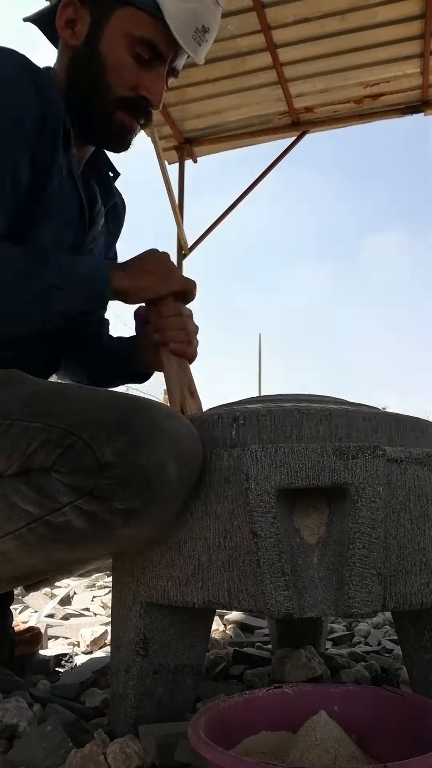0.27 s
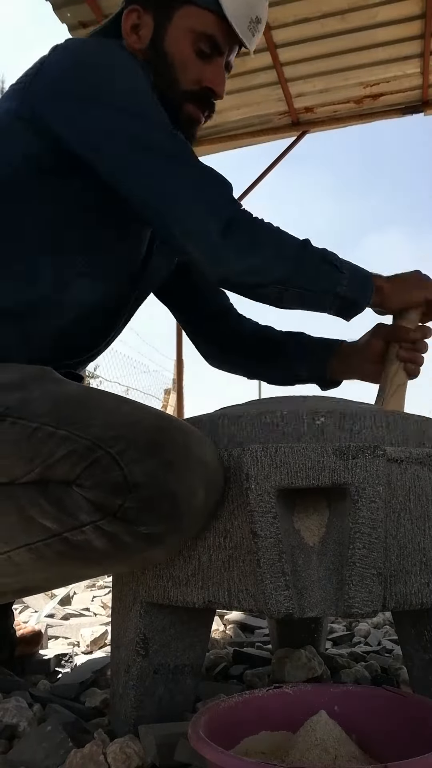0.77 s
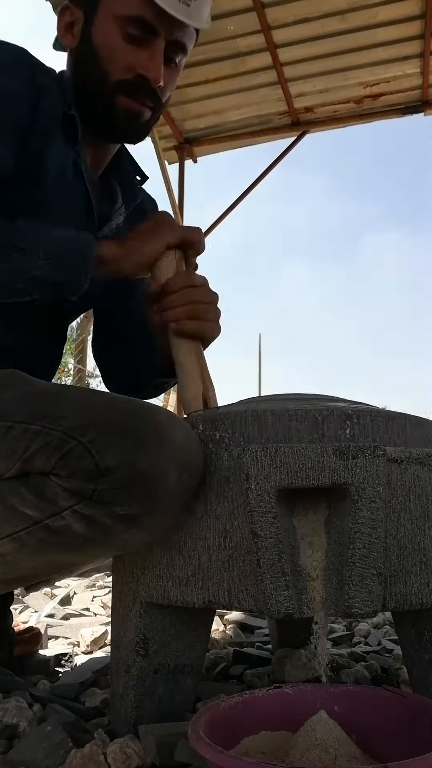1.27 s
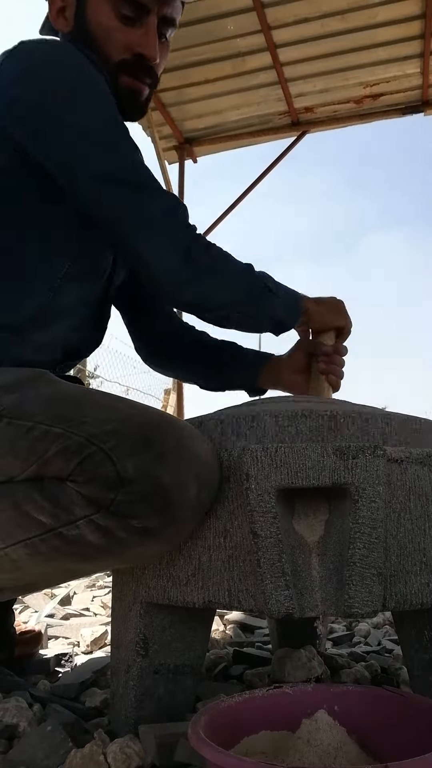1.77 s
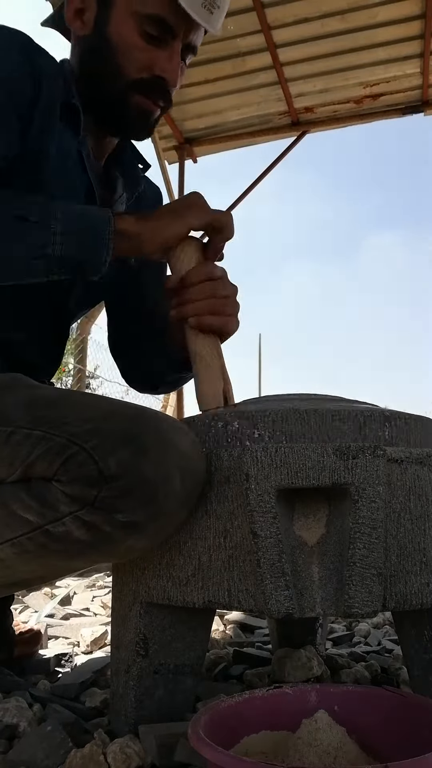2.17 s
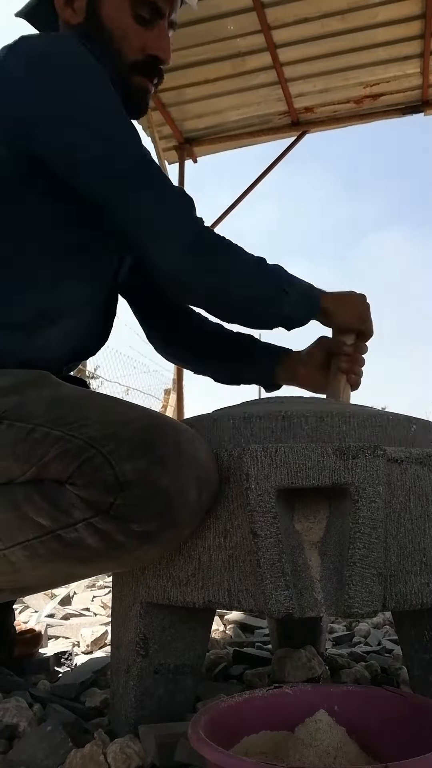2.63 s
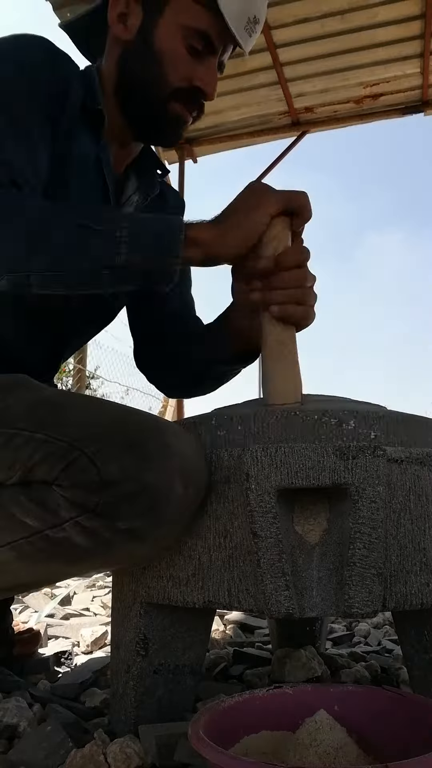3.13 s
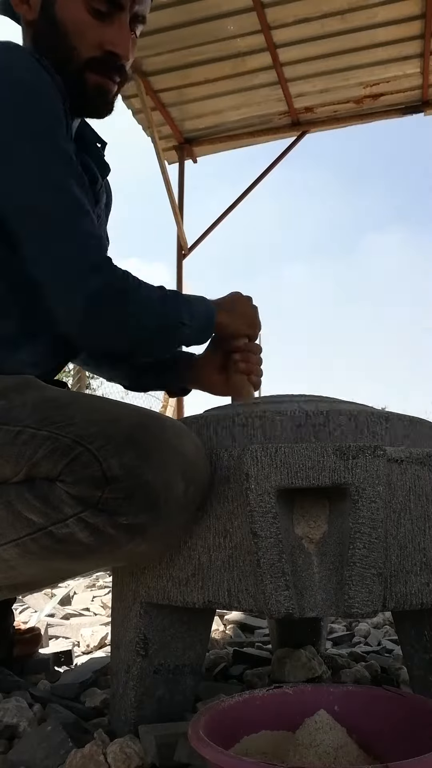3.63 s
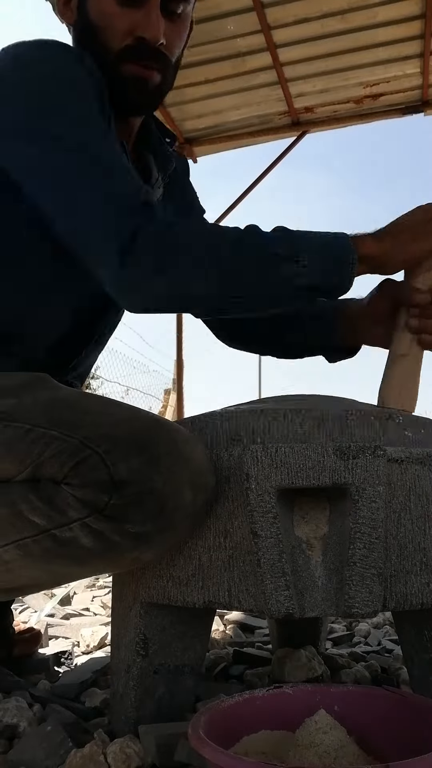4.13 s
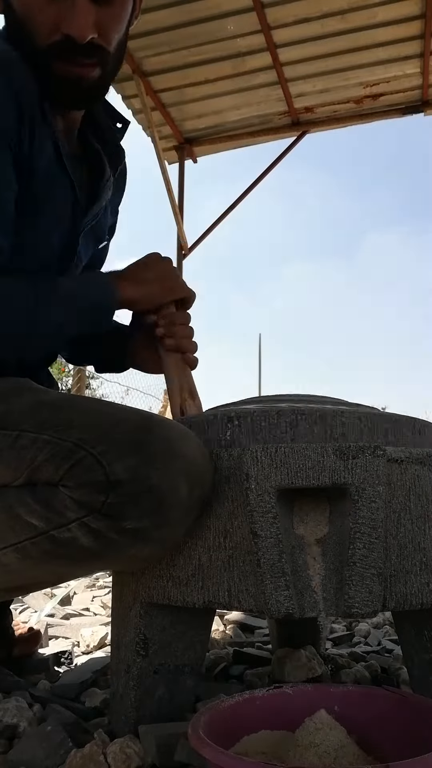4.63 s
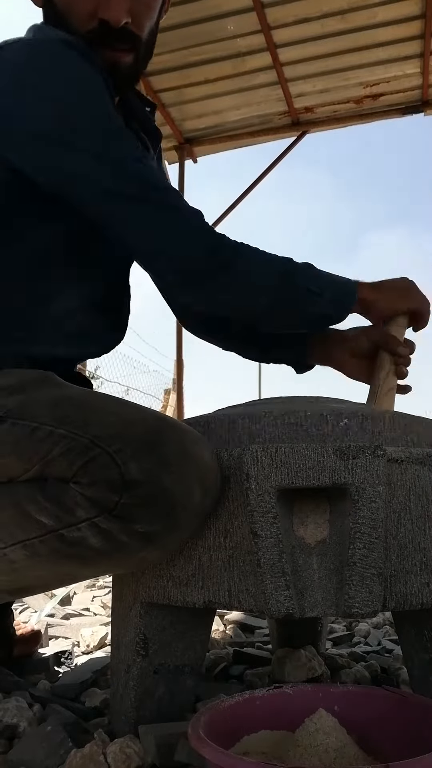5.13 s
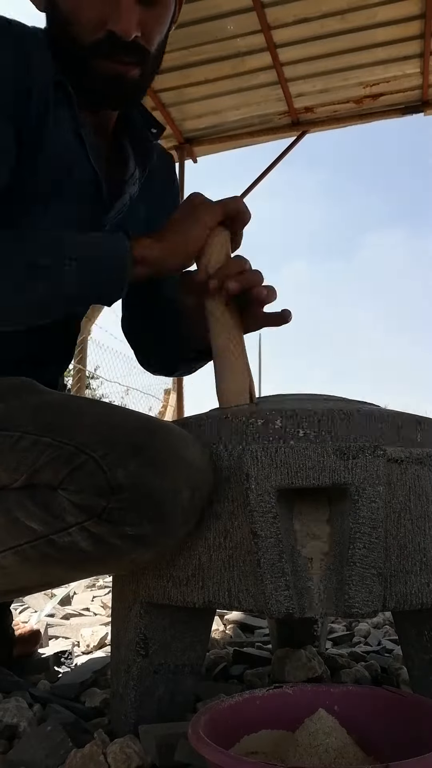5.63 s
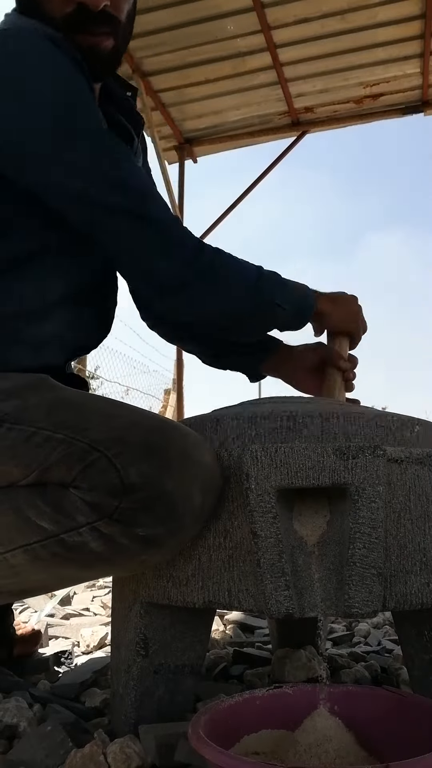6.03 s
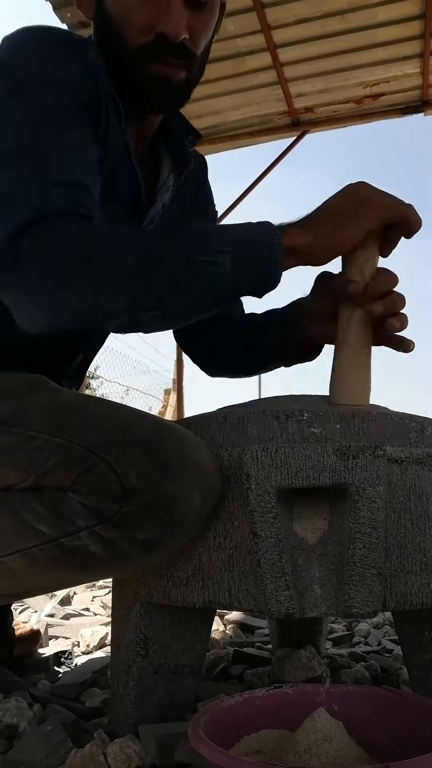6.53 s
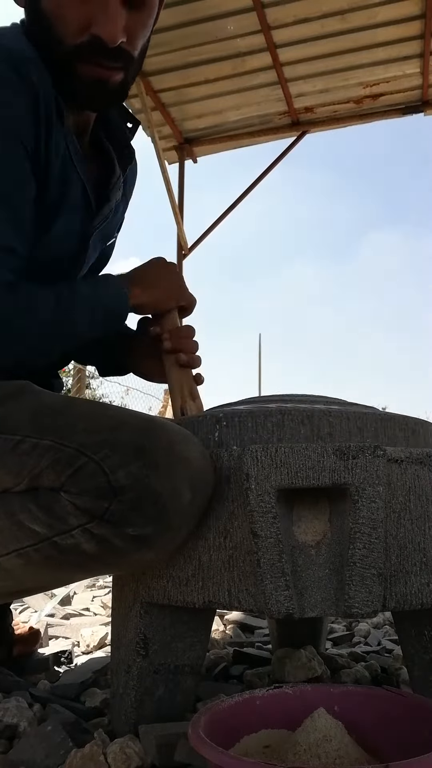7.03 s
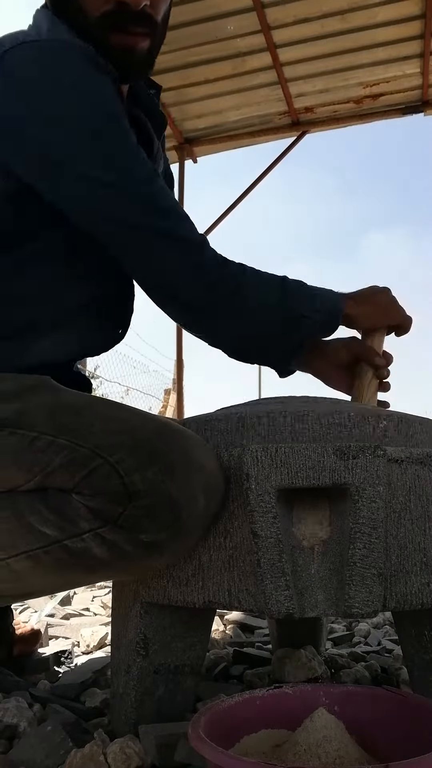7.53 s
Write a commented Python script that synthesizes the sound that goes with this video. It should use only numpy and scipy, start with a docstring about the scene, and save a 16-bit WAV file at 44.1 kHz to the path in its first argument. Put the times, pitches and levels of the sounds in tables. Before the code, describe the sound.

A stone hand mill is cranked steadily, a little under a second per turn. Grain crunches in low, hollow stone tones, strongest on each push, with dull thuds and knocking bumps. The iron pivot rings in short, wavering metallic tones and rattles about once a turn. Thin high squeaks slip through, and flour hisses softly throughout. Close stereo pickup under an open shelter, dry with only a few faint dull echoes.

```python
"""Heavy stones grind, thud and bump as a hand mill is turned under an open shelter, close to a pair of ports.
Crushed kernels and high spots set damped stone modes ringing; single kernels burst with a dull thud.
The iron pivot rings from dense slips, rattles most once a turn and is joined by thin gliding squeaks.
Flour hisses as flickering bands of noise, the stand thrums below, and a few dull echoes follow."""
import sys
import numpy as np
from scipy import signal
from scipy.io import wavfile
from scipy.ndimage import uniform_filter1d, map_coordinates

SR = 44100
rng = np.random.default_rng(int(sys.argv[2]) if len(sys.argv) > 2 else 0)


def ratio(d):
    """dB to gain"""
    e = np.asarray(d, float) / 20
    return 10 ** e


def waveform_to_disk(signal):
    """Save audio, clipped to [-1, 1], as 16-bit WAV at the path in sys.argv[1]."""
    frames = np.transpose(np.atleast_2d(signal))
    scaled = np.clip(frames, -1, 1) * 32767
    samples = np.round(scaled).astype(np.int16)
    wavfile.write(sys.argv[1], SR, samples)


N = 343980

# Levels in the tables are nominal: each layer adds its own trim.
# modes of the stones, deep, main and sharp: (f/Hz, width/Hz, level/dB)
STONE_LOW = [(131.6, 130, -39), (173.6, 37, -14), (226.2, 53, -10)]
STONE_MAIN = [(279.5, 26, -1.5), (327.3, 27.4, 6.5), (386, 47, 2.5), (490, 220, -7.5)]
STONE_HIGH = [(593, 160, 7), (668.5, 61, 2.5), (770, 85, 0), (953, 80, -12.5), (1072, 104, -12),
              (1320, 1700, -27.5)]
# deeper modes of the iron pivot: (f/Hz, width/Hz, level/dB, left over right/dB)
IRON_LOW = [(1593, 52, 0, 0)]
IRON_MIDDLE = [(2530, 17, 0, 0), (3672, 50, -20, -2)]
# how alike the two ports sound: (f/Hz, likeness 0-1)
PORT_LIKENESS = [(60, 1), (110, 1), (200, 0.93), (380, 0.94), (700, 0), (1290, 1), (2380, 0.05),
                 (4400, 0.51), (8120, 0), (15000, 0)]
# balance of the two ports: (f/Hz, left over right/dB)
PORT_LEAN = [(60, 0), (210, .5), (330, -1), (500, -6), (770, -6.5), (1170, 2), (2740, -1), (4190, -5.5),
             (6410, -5.5), (9810, -4.5), (15000, -11)]


def at_hz(points, hz):
    """A curve over frequency, read on a log-frequency axis."""
    return np.interp(np.log(hz), np.log(np.array(points)[:, 0]), np.array(points)[:, 1])


def rms_one(x):
    """Scaled to unit rms."""
    return x / np.sqrt(np.mean(x ** 2) + 1e-20)


def drift(rate):
    """Slow random wander of rms about 1: noise through two equal low-pass poles at rate Hz."""
    r = np.exp(-80 * np.pi * rate / SR)   # one slow step is 40 samples
    noise = rng.standard_normal(N // 40 + 2002)
    slow = signal.lfilter([1], [1, -2 * r, r * r], noise)[2000:]
    return np.interp(np.arange(N) / 40, np.arange(len(slow)), rms_one(slow))


def angle():
    """Handle angle in degrees, even speed within each turn."""
    # moments when the handle passes the light spot of its round: (t/s)
    turn_times = [-0.8, 0.02, 0.885, 1.78, 2.65, 3.52, 4.37, 5.28, 6.05, 6.83, 7.6, 8.38]
    return 360 * (np.interp(np.arange(N) / SR, turn_times, np.arange(len(turn_times))) % 1)


def round_turn(rows):
    """Columns of a table over one turn, repeated at every turn."""
    deg, *columns = np.transpose(rows)
    return [np.interp(angle(), deg, column, period=360) for column in columns]


def pressure_db():
    """Pressure on the grain round each turn, as a crushing level."""
    # a weak pull and a strong push: (angle/degrees, crushing level/dB)
    pull_and_push = [(0, -47.5), (30, -39.5), (60, -43.5), (90, -40.5), (120, -47), (150, -44.5),
                     (180, -43.5), (210, -40), (240, -34.5), (270, -30), (300, -32.5), (330, -37)]
    crush_db, = round_turn(pull_and_push)
    return crush_db


def swelling(steady_db, spells):
    """Gain of a steady level with spells on top that rise, hold and fall; powers add."""
    edge_s = 0.055   # longest rise or fall
    power, t = ratio(steady_db) ** 2 * np.ones(N), np.arange(N) / SR
    for middle_s, length_s, db in spells:
        half_s = length_s / 2
        a, b = np.searchsorted(t, [middle_s - half_s, middle_s + half_s])
        risen = np.clip((half_s - np.abs(t[a:b] - middle_s)) / min(edge_s, half_s), 0, 1)
        power[a:b] += (ratio(db) * np.sin(risen * np.pi / 2)) ** 2
    return np.sqrt(power)


def grains(per_s, spread_db, clump_db, clump_rate):
    """Signed sizes of random contacts that come in clumps; zero between them."""
    born = (rng.random(N) < per_s / SR) * rng.choice([-1, 1], N)
    return born * ratio(spread_db * np.minimum(rng.exponential(1, N), 5) + clump_db * drift(clump_rate))


def ring(force, hz, width_hz, lean_db):
    """One damped mode at two ports: force row 0 reaches both alike, row 1 in opposition."""
    # phase between the ports: (f/Hz, left leads/radians)
    port_lead = [(30, 0), (60, -.15), (150, -.4), (430, -1.1), (780, .8), (1290, -.7), (3600, -.3),
                 (5200, .2)]
    alike = np.clip(at_hz(PORT_LIKENESS, hz), 0, 1)
    ports = np.sqrt((1 + alike) / 2) * force[0] + np.sqrt((1 - alike) / 2) * force[1] * [[1], [-1]]
    pole = np.exp((2j * hz - width_hz) * np.pi / SR)
    swing = signal.lfilter([1], [1, -pole], ports + 1e-18)
    turn = np.exp(.5j * at_hz(port_lead, hz) * np.array([[1], [-1]]))
    return (swing * turn).imag * ratio(lean_db * np.array([[.5], [-.5]]))


def soft(x, modes):
    """Contacts last a moment and push both ways, so little sounds far outside the modes."""
    low_hz, high_hz = 0.83 * modes[0][0], min(1.11 * modes[-1][0], .45 * SR)
    return signal.sosfilt(signal.butter(3, [low_hz, high_hz], "band", fs=SR, output="sos"), x)


def rubbed(modes, sizes, scatter=0.63):
    """Every contact is a click that starts all modes at once, each with some strength of its own; rms 1."""
    at, out = np.flatnonzero(sizes), 0
    for hz, width_hz, db, *lean in modes:
        force = np.zeros((2, N))
        luck = rng.standard_normal((2, len(at)))
        force[:, at] = sizes[at] * ([[1], [0]] + [[scatter], [1]] * luck)
        lean_db = lean[0] if lean else at_hz(PORT_LEAN, hz)
        out = out + ratio(db) * np.sqrt(width_hz) * ring(force, hz, width_hz, lean_db)
    return rms_one(soft(out, modes))


def struck(events, modes, extra_db, pan_db, tilt_db=0):
    """Single blows start all modes at once, with new strengths each; tilt is dB per octave about 600 Hz."""
    at, out = np.round(events[:, 0] * SR).astype(int), 0
    luck = rng.standard_normal((len(at), 2 * len(modes)))
    for k, (hz, width_hz, db, *lean) in enumerate(modes):
        tilted_db = db + tilt_db * np.log2(hz / 600)
        size = ratio(events[:, 1] + extra_db + tilted_db + 2.5 * luck[:, 2 * k])
        force = np.zeros((2, N))
        force[0, at] = size
        force[1, at] = size * (0.84 * luck[:, 2 * k + 1] + np.tanh(pan_db / 17))
        out = out + ring(force, hz, width_hz, lean[0] if lean else at_hz(PORT_LEAN, hz))
    return soft(out, modes)


def steadied(x, share, over_s):
    """Friction feeds a ring less when it is already strong, which evens out its slow swings; rms 1."""
    power = uniform_filter1d(np.mean(x ** 2, axis=0), int(over_s * SR))
    return rms_one(x / (np.maximum(power, 0) + 1e-3) ** (share / 2))


def wavering(x, share):
    """Read a little faster and slower by turns, so the pitch wanders by this rms share."""
    at = np.arange(N) + np.cumsum(share * drift(8.9))
    return np.array([map_coordinates(port, [at], order=3, mode="mirror") for port in x])


def shelter(x):
    """Dull echoes from roof and ground: the right port's sound returns in the left, four times delayed."""
    dull = signal.sosfilt(signal.butter(1, [450., 3500.], "band", fs=SR, output="sos"), x)
    out = np.zeros_like(x)
    for lag_s, db in [(.006, -29), (.0085, -16), (.014, -14.5), (.019, -11)]:
        lag = int(lag_s * SR)
        out[0, lag:] += ratio(db) * dull[1, :-lag]
    return out


def flour():
    """Flour and dust hiss in the gap: uneven noise in narrow bands, each flickering a little on its own."""
    # colour of the hiss: (f/Hz, relative level per Hz/dB)
    hiss_colour = [(1000, -6.5), (1400, -3), (2150, -0.5), (3000, 0.4), (4400, -5), (5800, -7.5),
                   (7300, -5), (8000, -2.5), (9200, -2), (10400, -8.5), (10900, -14), (12000, -16),
                   (14000, -18), (15700, -31)]
    # flour spills out faster: (middle t/s, length/s, level/dB)
    spill_spells = [(1.2, 0.2, -59), (2.985, 0.35, -58), (3.798, 0.3, -60), (4.626, 0.18, -53),
                    (5.6, 0.33, -60), (6.333, 0.26, -51.5), (7.038, 0.16, -56)]
    out, together = 0, drift(9.)
    edges = 950 * 2 ** np.arange(0, 4.3, 1 / 6)   # sixth-octave bands
    white = rng.standard_normal((2, 2, N)) * ratio(0.8 * rng.exponential(1, N))
    crush_db = pressure_db()
    # the hiss is pinched off a little under pressure
    hiss = swelling(-52.5 - 0.065 * (crush_db - crush_db.mean()), spill_spells)
    for k, (low, high) in enumerate(zip(edges, edges[1:])):
        band = signal.butter(2, [low, high], "band", fs=SR, output="sos")
        mid, side = signal.sosfilt(band, white[k % 2])
        hz = np.sqrt(low * high)
        alike = np.clip(at_hz(PORT_LIKENESS, hz) - .05, 0, 1)
        flicker_db = 1.37 * together + 2.14 * drift(32.0)
        lean_db = at_hz(PORT_LEAN, hz) * np.array([[.5], [-.5]])
        gain = ratio(at_hz(hiss_colour, hz) + flicker_db + lean_db)
        out = out + gain * (np.sqrt(1 + alike) * mid + np.sqrt(1 - alike) * side * [[1], [-1]])
    return ratio(5.5) * hiss * rms_one(out)


def squeaks():
    """Short near-sines that glide, flutter and fade at both ends, louder at the right port."""
    # thin gliding squeaks: (start t/s, end t/s, first f/Hz, last f/Hz, level/dB)
    glides = [(.54, .6, 14400, 13900, -70), (1.7, 1.745, 11200, 12300, -64),
              (1.785, 1.93, 12000, 8300, -62), (2.18, 2.255, 9900, 10600, -59),
              (3.85, 3.92, 8300, 8700, -63), (3.97, 4.03, 9300, 8400, -63), (3.57, 3.62, 10600, 9700, -60),
              (5.35, 5.42, 9800, 8900, -61), (5.64, 5.68, 9500, 10100, -59),
              (6.845, 6.875, 8600, 8100, -62), (6.93, 7.005, 10300, 8600, -60),
              (7.11, 7.15, 8250, 9150, -60), (7.145, 7.18, 9050, 9550, -60),
              (7.175, 7.205, 9520, 9680, -61), (7.21, 7.29, 9500, 8600, -64)]
    out, flutter = np.zeros(N), ratio(1.5 * drift(40.))
    for start_s, end_s, first_hz, last_hz, db in glides:
        a, b = int(start_s * SR), int(end_s * SR)
        phase = 2 * np.pi * np.cumsum(np.linspace(first_hz, last_hz, b - a)) / SR
        out[a:b] += ratio(db) * np.hanning(b - a) ** .3 * np.sin(phase)
    return out * flutter * ratio([[3.5], [8.5]])   # left, right


def rattle():
    """The loose iron chatters in uneven ticks, freed once a turn, and jolts in single blows."""
    # modes of the loose iron: (f/Hz, width/Hz, level/dB, left over right/dB)
    loose_modes = [(3400, 900, -8, -2), (4900, 600, -3, -4), (5195, 60, -6, -5), (5700, 55, -1, -5),
                   (7000, 900, -3, -4), (8460, 90, -7, -4), (9150, 700, -3, -4), (10330, 90, -10, -5),
                   (11280, 70, -12, -6), (12500, 900, -21, -7)]
    # fits of rattling: (middle t/s, length/s, level/dB)
    rattle_fits = [(0.006, 0.1, -54.5), (0.818, 0.36, -59.5), (1.752, 0.23, -52.5), (2.688, 0.062, -53.5),
                   (2.96, 0.22, -71.0), (3.3, 0.22, -69), (3.526, 0.22, -58.5), (3.75, 0.43, -77),
                   (4.09, 0.1, -73), (4.32, 0.22, -58.5), (5.15, 0.4, -66), (5.2, 0.14, -60),
                   (5.983, 0.041, -52.5), (6.41, 0.52, -64), (6.748, 0.086, -51.5), (7.27, 0.39, -66),
                   (7.525, 0.036, -47)]
    # single jolts: (t/s, level/dB)
    jolt_blows = [(0.0523, -29), (0.7008, -33), (0.7243, -22), (0.7801, -23), (0.791, -26), (0.8503, -32),
                  (0.877, -29), (0.908, -32), (0.9527, -31), (1.3498, -34.5), (1.657, -28), (1.667, -28),
                  (1.718, -34), (1.738, -18), (1.7674, -27), (1.783, -29), (1.793, -21), (1.807, -30),
                  (2.57, -22), (2.66, -39), (2.6883, -29), (3.1862, -26), (3.4404, -19), (3.4965, -36),
                  (3.532, -19), (4.068, -21), (4.277, -14), (4.3096, -19), (4.375, -23.5), (4.3999, -21.5),
                  (4.917, -27), (5.153, -21), (5.246, -24), (5.5682, -46), (5.7144, -41), (5.7468, -33),
                  (5.829, -23), (5.9674, -17), (6.0382, -24), (6.733, -24), (6.8746, -28), (7.3677, -25),
                  (7.5133, -24), (7.583, -27), (7.641, -22)]
    from_slack = (angle() - 479 + 180) % 360 - 180   # degrees from the slack spot
    slack_db = 8 * np.exp(-(from_slack / 21) ** 2)
    loose = swelling(-77 + slack_db, rattle_fits)
    ticks = grains(1300., spread_db=2.7, clump_db=5.5, clump_rate=53.0)
    chatter = ratio(8.0) * loose * steadied(rubbed(loose_modes, ticks), 0.27, .02)
    return chatter + struck(np.array(jolt_blows), loose_modes, -16.5, 0)


def pivot():
    """Dense slips keep the iron ringing; pitch and strength wander as the grip on it changes."""
    # higher modes of the pivot: (f/Hz, width/Hz, level/dB, left over right/dB)
    iron_high = [(4094, 24, 0, -6), (4640, 24, -11, -4), (7780, 50, -15, -4)]
    iron_top = [(5195, 18, 0, -5), (6588, 24, -3, -5)]
    # modes take turns as the contact travels round: (angle/degrees, low, middle, high level/dB)
    contact_round = [(0.0, -52, -57.5, -67), (30.0, -60, -55, -62), (60.0, -64, -59.5, -59),
                     (96, -58, -53.5, -61), (122, -61, -62.5, -69), (152, -65, -56, -72),
                     (181, -72, -63.5, -83), (208, -66, -64, -65.5), (227, -53.5, -52, -61.5),
                     (262, -57, -58.5, -61.5), (308, -51, -54, -64), (346, -56.5, -50, -66)]
    # spells when one mode sings out: (middle t/s, length/s, level/dB, mode f/Hz)
    singing_spells = [(0.01, 0.12, -55, 5197.0), (0.015, 0.11, -45, 2522.0), (0.075, 0.22, -56, 4095.0),
                      (0.117, 0.36, -60, 1592.0), (0.18, 0.05, -49, 2522.0), (0.38, 0.06, -61, 4095.0),
                      (0.64, 0.07, -44.5, 2522.0), (0.797, 0.09, -42, 2522.0), (0.74, 0.14, -44.5, 1592.0),
                      (0.8, 0.32, -67, 5197.0), (0.82, 0.05, -56, 5197.0), (1.68, 0.055, -64, 5197.0),
                      (0.912, 0.031, -46, 1592.0), (0.96, 0.07, -44, 1592.0), (0.96, 0.054, -50, 2522.0),
                      (1.13, 0.37, -68, 5197.0), (1.158, 0.068, -51, 2522.0), (1.523, 0.04, -40, 1592.0),
                      (1.513, 0.15, -50.5, 2522.0), (1.613, 0.059, -48, 2522.0), (1.7, 0.13, -44.5, 2522.0),
                      (1.62, 0.2, -66, 4095.0), (1.573, 0.03, -48, 1592.0), (1.606, 0.071, -44, 1592.0),
                      (1.665, 0.053, -48, 1592.0), (1.755, 0.1, -44.5, 1592.0),
                      (1.843, 0.14, -44.5, 1592.0), (2.24, 0.053, -59, 1592.0), (4.286, 0.12, -47, 1592.0),
                      (4.402, 0.08, -49, 1592.0), (5.11, 0.05, -49, 1592.0), (5.347, 0.041, -55, 1592.0),
                      (5.726, 0.066, -53, 1592.0), (6.29, 0.035, -47, 1592.0), (6.749, 0.18, -56, 1592.0),
                      (7.49, 0.07, -53, 1592.0), (7.653, 0.06, -53, 1592.0), (1.82, 0.33, -72, 5197.0),
                      (1.87, 0.22, -58, 4095.0), (1.96, 0.17, -58, 2522.0), (2.11, 0.087, -50.5, 2522.0),
                      (2.287, 0.2, -59, 2522.0), (2.283, 0.056, -57, 4095.0), (2.47, 0.3, -61, 1592.0),
                      (2.594, 0.21, -49.5, 2522.0), (2.67, 0.36, -67, 4095.0), (2.69, 0.052, -47, 1592.0),
                      (2.917, 0.12, -56.5, 4095.0), (2.926, 0.09, -52, 2522.0), (2.96, 0.42, -69, 5197.0),
                      (2.964, 0.24, -53.5, 1592.0), (3.058, 0.096, -46.5, 2522.0),
                      (3.08, 0.08, -61, 4095.0), (3.163, 0.13, -63, 1592.0), (3.283, 0.038, -45, 1592.0),
                      (3.326, 0.046, -43, 1592.0), (3.365, 0.028, -54, 1592.0), (3.405, 0.028, -41, 1592.0),
                      (3.445, 0.029, -43, 1592.0), (3.455, 0.047, -39.5, 2522.0),
                      (3.578, 0.17, -61, 4095.0), (3.624, 0.033, -39.5, 2522.0), (3.61, 0.13, -45, 1592.0),
                      (3.782, 0.12, -52, 1592.0), (3.87, 0.2, -72, 4095.0), (4.083, 0.08, -51.5, 4095.0),
                      (4.117, 0.22, -54, 2522.0), (4.033, 0.061, -58, 1592.0), (4.172, 0.23, -56, 1592.0),
                      (4.337, 0.13, -47, 2522.0), (4.463, 0.1, -50.5, 2522.0), (4.573, 0.12, -49, 2522.0),
                      (4.53, 0.29, -57, 4095.0), (4.53, 0.36, -80, 5197.0), (4.53, 0.27, -67, 1592.0),
                      (4.667, 0.08, -54, 2522.0), (4.884, 0.056, -51.5, 2522.0), (4.912, 0.06, -50, 1592.0),
                      (4.965, 0.06, -48, 1592.0), (5.019, 0.044, -38, 1592.0),
                      (4.999, 0.051, -45.5, 4095.0), (5.045, 0.05, -48.5, 4095.0),
                      (5.058, 0.47, -60.5, 4095.0), (5.028, 0.053, -42, 2522.0),
                      (5.078, 0.11, -42.5, 2522.0), (5.17, 0.09, -43.5, 2522.0),
                      (5.222, 0.052, -46, 2522.0), (5.31, 0.4, -66, 5197.0), (5.404, 0.26, -53.5, 4095.0),
                      (5.493, 0.047, -47, 1592.0), (5.6, 0.35, -60, 2522.0), (5.609, 0.11, -44, 2522.0),
                      (5.663, 0.42, -65, 1592.0), (5.768, 0.26, -54, 4095.0), (5.877, 0.15, -49, 2522.0),
                      (5.878, 0.21, -54, 4095.0), (6.066, 0.058, -44.5, 2522.0), (6.084, 0.23, -63, 1592.0),
                      (6.227, 0.2, -64, 2522.0), (6.274, 0.57, -66, 5197.0), (6.272, 0.38, -59.5, 4095.0),
                      (6.477, 0.42, -52.5, 2522.0), (6.504, 0.046, -46.5, 1592.0),
                      (6.6, 0.2, -51.5, 4095.0), (6.757, 0.18, -46.5, 2522.0), (6.942, 0.17, -51, 1592.0),
                      (6.96, 0.32, -73, 5197.0), (7.004, 0.1, -51.5, 2522.0), (7.01, 0.38, -60.5, 4095.0),
                      (7.155, 0.13, -56, 2522.0), (7.298, 0.11, -49, 1592.0), (7.357, 0.32, -49.5, 2522.0),
                      (7.403, 0.19, -52, 4095.0), (7.5, 0.32, -67, 5197.0), (7.62, 0.15, -56.5, 4095.0),
                      (7.66, 0.24, -59, 2522.0), (7.668, 0.031, -40.5, 2522.0)]
    low_db, middle_db, high_db = round_turn(contact_round)
    # modes, steady level/dB, trim/dB, pitch wander as a share of 0.00792
    groups = [(IRON_LOW, low_db, .5, 0.294), (IRON_MIDDLE, middle_db, 4.2, 0.609),
              (iron_high, high_db, 6., 0.502), (iron_top, -71.5, 7.5, .25)]
    out = 0
    for modes, steady_db, trim_db, waver in groups:
        spells = [row[:3] for row in singing_spells if abs(np.log(row[3] / modes[0][0])) < .1]
        slips = grains(1300., spread_db=1.5, clump_db=1.2, clump_rate=25.)
        flutter = ratio(trim_db + 2.5 * drift(36))
        tone = steadied(wavering(rubbed(modes, slips), 0.00792 * waver), .7, .03)
        out = out + flutter * swelling(steady_db, spells) * tone
    return out


def thuds():
    """A bursting kernel pushes the stone for a cycle or two, damped by the meal around it."""
    # single bursts: (t/s, level/dB)
    bursts = [(0.031, -25), (0.062, -26), (0.132, -30), (0.263, -30), (0.375, -25), (0.408, -28),
              (0.437, -24), (0.478, -17), (0.526, -23), (0.56, -16), (0.572, -15), (0.586, -18),
              (0.608, -19), (0.649, -20), (0.662, -15), (0.69, -18), (0.766, -18), (0.934, -31),
              (0.953, -19), (1.016, -30), (1.056, -25), (1.282, -22), (1.327, -24), (1.35, -19),
              (1.364, -18.5), (1.388, -20), (1.411, -26), (1.425, -21), (1.442, -24), (1.48, -20),
              (1.508, -16), (1.529, -17), (1.553, -18), (1.601, -15), (1.612, -20), (1.629, -27),
              (1.648, -18), (1.661, -16), (1.735, -25), (1.818, -31), (1.853, -16), (1.91, -24),
              (2.159, -23), (2.225, -20), (2.271, -21.5), (2.353, -36), (2.394, -18), (2.435, -14),
              (2.501, -13), (2.527, -14.5), (2.609, -21.5), (2.69, -23), (2.798, -28), (2.867, -21),
              (2.914, -19), (2.979, -25), (3.157, -23), (3.22, -20), (3.258, -21), (3.29, -17),
              (3.368, -25), (3.4, -19), (3.431, -19), (3.602, -21), (3.663, -21), (3.714, -24),
              (3.769, -18.5), (3.803, -29), (3.851, -21), (3.98, -28), (4.011, -17), (4.05, -13),
              (4.164, -22), (4.404, -25), (4.434, -26), (4.495, -22), (4.542, -22.5), (4.565, -28),
              (4.606, -23), (4.67, -23), (4.779, -28), (4.858, -18), (4.899, -12), (4.963, -11.5),
              (5.006, -10), (5.111, -36), (5.164, -18), (5.244, -31), (5.349, -28), (5.371, -34),
              (5.4, -29), (5.482, -15.5), (5.555, -27), (5.634, -24), (5.658, -26), (5.699, -16),
              (5.709, -13), (5.75, -19), (5.783, -19), (5.827, -16.5), (5.87, -14), (5.943, -28),
              (5.965, -20), (5.982, -25), (6.064, -29), (6.131, -32), (6.187, -17), (6.205, -17),
              (6.231, -20), (6.28, -22.5), (6.334, -21), (6.443, -22), (6.455, -20), (6.495, -12),
              (6.539, -24), (6.579, -29), (6.652, -24), (6.71, -26), (6.872, -25), (6.917, -19),
              (6.953, -14), (7.035, -31), (7.099, -19), (7.178, -28), (7.266, -14), (7.305, -15.5),
              (7.337, -21), (7.373, -14), (7.418, -21), (7.427, -15.5), (7.482, -16), (7.658, -22),
              (7.708, -25), (7.739, -20)]
    # a thud rings 1.6 times shorter than the crush
    damped = [(hz, 1.6 * width_hz, db) for hz, width_hz, db in STONE_LOW[-1:] + STONE_MAIN]
    return struck(np.array(bursts), damped, -12.5, 0)


def bumps():
    """A bump snaps in the upper modes and the pivot, then bounces; a heavy one also shakes the whole stone."""
    # stone on stone: (t/s, snap level/dB, heft above the snap/dB, lean to the left/dB)
    stone_hits = [(0.032, -24, 3.5, 19), (0.563, -26, 11, -1), (0.61, -30, 5, -6), (0.664, -35, 16, -2),
                  (0.693, -22, 3.5, -9), (0.769, -26.5, -4, -8), (0.936, -23.5, 0, 22),
                  (1.351, -42, -4.5, -9), (1.439, -33, 0, -1), (1.482, -32.5, 12.5, -2),
                  (1.5133, -18, -14, -4), (1.532, -24, 3, -10), (1.6, -28.5, 13.5, -4),
                  (1.66, -24.5, 5, -7), (1.838, -21, -8, 20), (1.857, -23, -10, -10), (2.224, -37, -5, -4),
                  (2.353, -30, 3, 0), (2.438, -24.5, -1, 3), (2.488, -24, 8.5, -1), (3.16, -30.5, 2, -13),
                  (3.256, -30, 1, -9.0), (3.298, -23.5, 4, -9), (3.368, -23.5, 4, -9), (3.434, -22, -5, 1),
                  (3.606, -20.5, -5, 25), (4.011, -26, -9, -5), (4.049, -23.5, 12, 0),
                  (4.165, -22.5, -19, -1), (4.407, -32.5, -8, 10), (4.499, -30.5, 2, 3),
                  (4.846, -34, -1, -7), (4.901, -23, 11.5, 5), (4.916, -21.5, 5, 4), (4.964, -28, 6, -7),
                  (5.0139, -17, -3, 18), (5.029, -28, 9.5, 0), (5.112, -22.5, 3, -3), (5.166, -28.5, 6, 3),
                  (5.245, -24.5, -1.5, 25), (5.368, -34, -3, -1), (5.394, -44, 5, -1), (5.485, -23, 1, -4),
                  (5.637, -22, -2, 7), (5.687, -44, 4, -6.5), (5.712, -22.5, -16, 6), (5.879, -28.5, 5, -1),
                  (5.947, -27.5, 9, 6), (6.066, -29, 1.5, 7), (6.131, -29.5, 4, 0), (6.175, -34, -6, -2),
                  (6.191, -21.5, -10, 6), (6.281, -26.5, -8, -10), (6.496, -25.5, 7.5, -2),
                  (6.502, -20, -3, 11), (6.873, -26, -11, 19), (6.953, -20.5, -3, 15), (7.663, -22, -25, 9),
                  (7.718, -28, 2, 1)]
    # the first touch, dead within a cycle: (f/Hz, width/Hz, level/dB)
    crack_modes = [(895, 510, -20), (1290, 600, -21.5), (2180, 2700, -44.5)]
    rows = np.array(stone_hits)
    snap_db, heft_db, pan_db = rows[:, 1], rows[:, 2], rows[:, 3]
    body = struck(rows, STONE_MAIN, heft_db - 11.0, pan_db)
    # a hard blow is shorter than a crush, so it favours the upper modes
    bright = [(hz, 1.74 * width_hz, db) for hz, width_hz, db in STONE_HIGH]
    tilt_db = 19.0 + 1.5 * (snap_db + 24)   # a harder bump is brighter
    edge = struck(rows, bright, -9.0, pan_db, tilt_db)
    edge += struck(rows, crack_modes, 0, pan_db, tilt_db)
    # it lands twice more, unevenly, weaker and duller
    later_s = np.cumsum(0.0076 * rng.uniform(0.364, 1.6, (len(rows), 2)), axis=1)
    for k in range(2):
        landing = rows + np.outer(later_s[:, k], [1, 0, 0, 0])
        edge += struck(landing, bright, -7.5 - 7.5 * (k + 1), pan_db, tilt_db - 12.0)
    iron = struck(rows, IRON_LOW, -12.5, pan_db) + struck(rows, IRON_MIDDLE, -25.0, pan_db)
    return body + edge + iron


def stones_and_stand():
    """Crushing kernels drive the main and sharp stone modes; rolling weight drives the deep ones and the stand."""
    # modes of the stand: (f/Hz, width/Hz, level/dB)
    stand_modes = [(39.8, 38, -4), (61.9, 5.2, 2), (94, 15, -1.5)]
    # heaps of kernels giving way: (middle t/s, length/s, crush level/dB, grit against it/dB)
    crunch_spells = [(0.046, 0.2, -40, 2), (0.435, 0.13, -36.5, -25), (0.629, 0.4, -33.5, -0.5),
                     (0.67, 0.061, -29, -5), (0.799, 0.085, -35.5, 4.5), (1.026, 0.25, -35, -11.5),
                     (1.38, 0.18, -29.5, -19), (1.516, 0.32, -34, -1), (1.641, 0.17, -32, -1),
                     (1.91, 0.15, -33.5, -10.5), (2.14, 0.19, -45, -14), (2.239, 0.11, -27.5, -12),
                     (2.507, 0.28, -34.5, -1.5), (2.83, 0.29, -37, -9), (3.027, 0.06, -40, -10),
                     (3.443, 0.099, -32, 2.5), (3.634, 0.1, -37.5, 1.5), (3.756, 0.33, -41, -2),
                     (4.056, 0.14, -26, -6.5), (4.177, 0.045, -26, -10), (4.268, 0.12, -38, -1.5),
                     (4.4, 0.14, -46, -15), (4.616, 0.3, -35, -11), (4.965, 0.31, -36.5, -4),
                     (5.234, 0.08, -51, -11), (5.407, 0.094, -26, -9), (5.458, 0.23, -31.5, -10),
                     (5.584, 0.088, -40, -1), (5.641, 0.084, -34.5, 0), (5.72, 0.082, -30, 1.5),
                     (5.847, 0.36, -33, -9), (5.874, 0.049, -18.5, -13), (5.962, 0.059, -24, -3),
                     (6.068, 0.043, -33, -13), (6.198, 0.13, -25.5, -6.5), (6.29, 0.41, -38.5, -7),
                     (6.5, 0.031, -29, -10), (6.582, 0.17, -27.5, -6.5), (6.741, 0.09, -29, -1.5),
                     (6.96, 0.046, -28, -6), (7.034, 0.4, -33, -9), (7.374, 0.37, -29.5, -8.5),
                     (7.74, 0.23, -31.5, -2), (7.76, 0.079, -26, -15)]
    # the stone settles its weight: (middle t/s, length/s, level/dB)
    heave_spells = [(0.183, 0.68, -41.5), (0.553, 0.33, -39.5), (0.793, 0.13, -40), (1.035, 0.22, -38),
                    (1.483, 0.34, -41.5), (1.948, 0.32, -35), (2.21, 0.14, -37.5), (2.472, 0.29, -44.5),
                    (2.923, 0.33, -39.5), (3.296, 0.47, -45), (3.759, 0.35, -36), (4.09, 0.29, -39),
                    (4.612, 0.13, -32.5), (4.88, 0.4, -36), (5.48, 0.26, -36.5), (5.715, 0.1, -36),
                    (5.888, 0.2, -40), (6.155, 0.2, -38.5), (6.317, 0.38, -37), (6.502, 0.15, -32.5),
                    (6.85, 0.29, -39.5), (7.063, 0.48, -39), (7.378, 0.38, -40.5), (7.715, 0.19, -37)]
    # the stand shudders: (middle t/s, length/s, level/dB)
    shudder_spells = [(0.066, 0.13, -39.5), (0.95, 0.34, -40), (1.174, 0.081, -39), (1.39, 0.088, -43),
                      (1.832, 0.2, -39.5), (2.54, 0.32, -42), (2.65, 0.31, -42.5), (2.95, 0.18, -42),
                      (3.19, 0.12, -44), (3.581, 0.24, -46), (3.654, 0.13, -35.5), (3.81, 0.32, -57),
                      (4.21, 0.32, -39.5), (4.51, 0.14, -41), (4.975, 0.15, -35.5), (5.187, 0.2, -41.0),
                      (5.256, 0.055, -39), (5.58, 0.41, -42.5), (5.939, 0.36, -46), (6.443, 0.29, -41.5),
                      (6.885, 0.41, -42), (6.96, 0.19, -35), (7.37, 0.32, -45), (7.74, 0.22, -35.5)]
    crush_db = pressure_db()
    swing_db = crush_db - crush_db.mean()
    crush = swelling(crush_db, [row[:3] for row in crunch_spells])
    grit_spells = [(s, length, db + grit_db - 4.5) for s, length, db, grit_db in crunch_spells]
    # grit and weight follow a share of the pressure swing
    grit = swelling(-50 + 0.55 * swing_db, grit_spells)
    weight = swelling(-44 + 0.018 * swing_db, heave_spells)
    shake = swelling(-47, shudder_spells)
    kernels = grains(380., spread_db=2.0, clump_db=2.0, clump_rate=21.4)
    rolling = grains(480., spread_db=1.05, clump_db=3.0, clump_rate=13.3)
    main = ratio(-1.5) * crush * steadied(rubbed(STONE_MAIN, kernels), 0.37, 0.073)
    low = weight * steadied(rubbed(STONE_LOW, rolling), 0.74, 0.085)
    high = grit * steadied(rubbed(STONE_HIGH, kernels), 0.12, 0.03)
    thrum = ratio(0.95) * shake * steadied(rubbed(stand_modes, rolling), 0.85, 0.1)
    return main + low + high + thrum


def scene():
    """The mill with its echoes, and the flour hiss without any."""
    mill = stones_and_stand() + bumps() + thuds() + pivot() + rattle() + squeaks()
    return mill + shelter(mill) + flour()


def band_limit(x):
    """A steep low-pass at the top of the band."""
    return signal.sosfilt(signal.butter(12, 15780, fs=SR, output="sos"), x)


def record(dry):
    """The deepest bass is cut below 42 Hz."""
    mix = signal.sosfilt(signal.butter(2, 42., "high", fs=SR, output="sos"), dry)
    return band_limit(mix)


dry = scene()
out = record(dry)
waveform_to_disk(out)
```